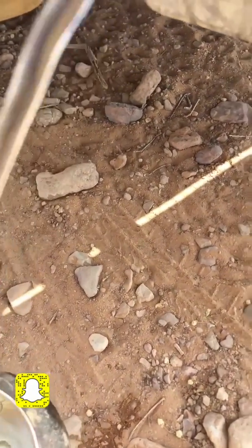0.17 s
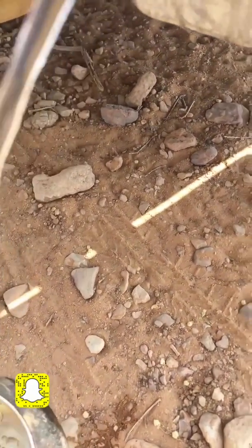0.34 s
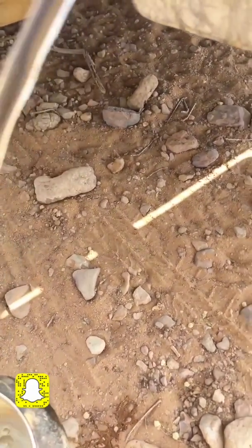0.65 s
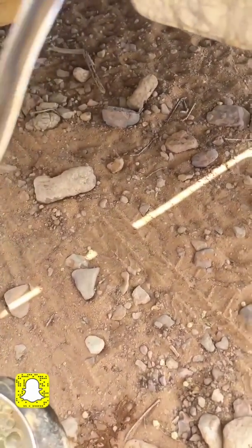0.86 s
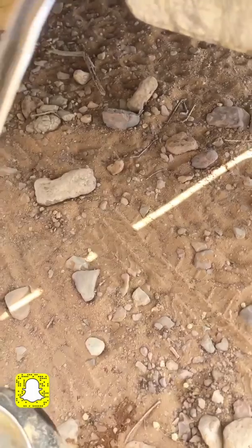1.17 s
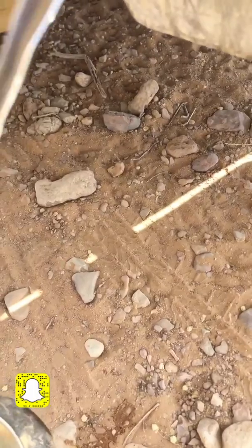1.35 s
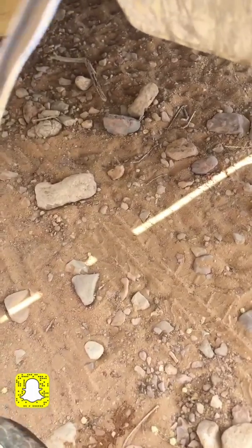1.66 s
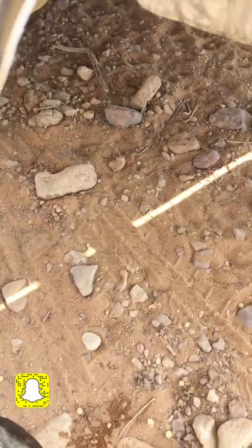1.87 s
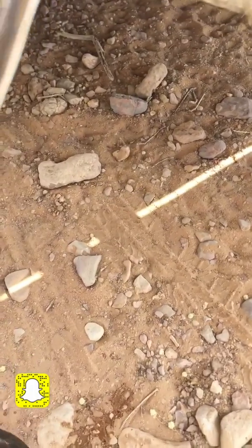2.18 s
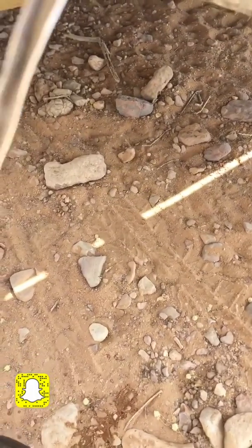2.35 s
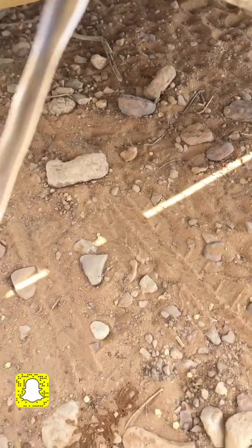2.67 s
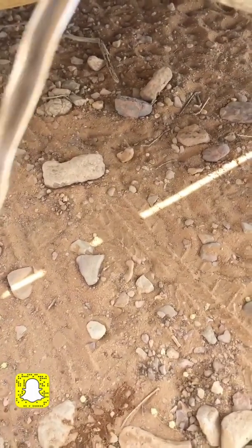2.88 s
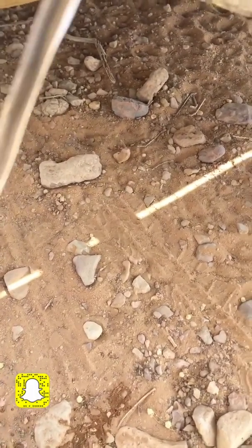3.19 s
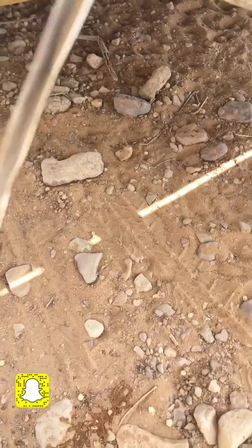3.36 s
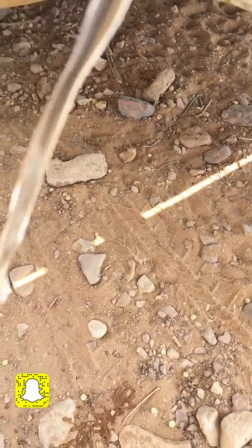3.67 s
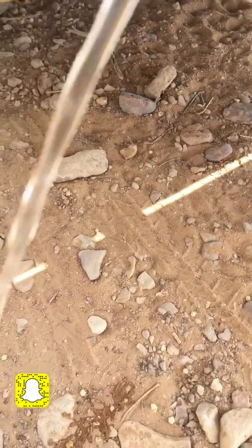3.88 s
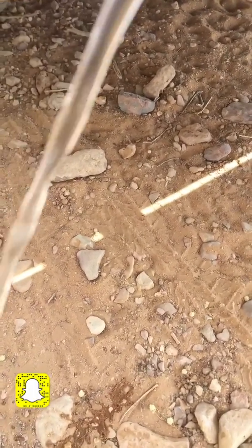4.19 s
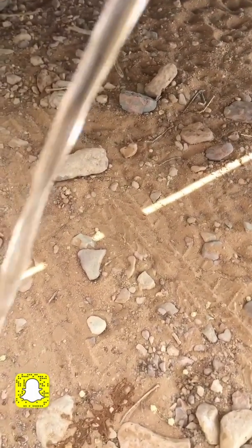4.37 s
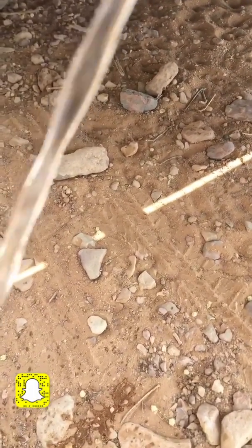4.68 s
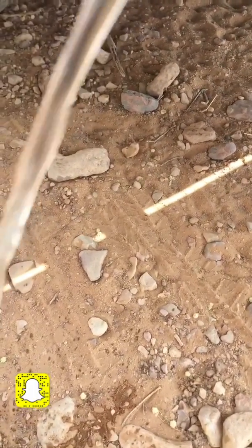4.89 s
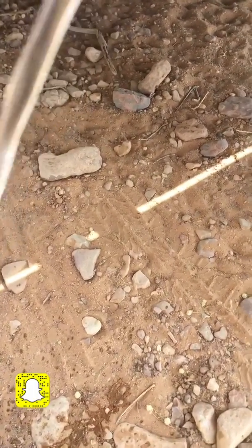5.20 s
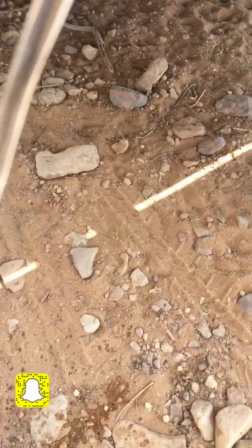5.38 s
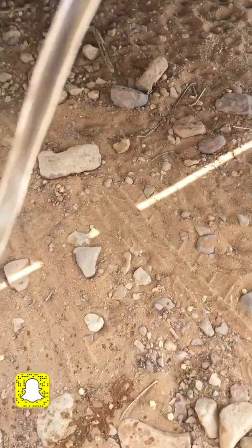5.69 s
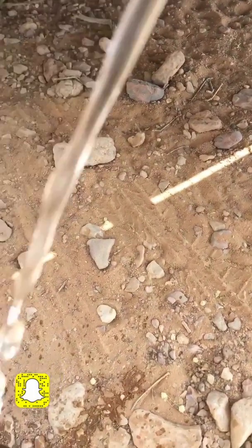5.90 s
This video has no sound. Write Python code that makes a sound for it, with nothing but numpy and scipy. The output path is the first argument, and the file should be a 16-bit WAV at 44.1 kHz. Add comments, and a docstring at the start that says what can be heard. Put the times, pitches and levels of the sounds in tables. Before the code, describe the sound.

Close, continuous trickling of water falling into a filling metal bowl, with hollow bubbly plops, deep glugs and bright spray ticks in open air.

```python
"""A thin stream of water falls from a height into a part-filled metal bowl, outdoors and close by.
The jet entrains air: large pockets glug as sinking tones, pinched-off bubbles plink as decaying resonators
on a slowly rising hollow note, and spray ticks on the surface as short bright tones and noise bursts.
Noise washes and swarms of small bubbles fill in the stirred water and fine hiss. Sparse echoes give the
wall's brief answer; the base sizzles and drums ever more faintly, over a low rumble of open air."""
import sys
import numpy as np
from scipy import signal
from scipy.fft import rfft, irfft, next_fast_len
from scipy.io import wavfile
from scipy.ndimage import uniform_filter1d, map_coordinates

SR = 44100
rng = np.random.default_rng(int(sys.argv[2]) if len(sys.argv) > 2 else 0)


def dump_mix(stems):
    """Bounce the given channels to the path in sys.argv[1] as a 16-bit WAV at rate SR."""
    frames = np.atleast_2d(stems).T  # one column per channel
    limited = np.clip(frames, -1, 1)  # hard clip at full scale
    pcm = np.round(limited * 32767).astype(np.int16)
    wavfile.write(sys.argv[1], SR, pcm)


N = 266584

# Largest air pockets under the jet: [start t/s, level/dB before the layer's trim, f/Hz, length/cycles]
GLUGS = [(0.15, -14.5, 189, 1.8), (0.297, -18.5, 190.3, 3.5), (0.526, -18, 210, 1.3),
         (0.563, -23, 174.8, 3.9), (0.927, -17.5, 162.2, 3.1), (0.986, -22.5, 204, 2.5),
         (1.204, -10.5, 164.2, 1.26), (1.243, -21, 196.3, 2), (1.268, -17, 173.5, 5.5),
         (1.521, -14, 158.7, 1.8), (1.565, -17.5, 227, 2.5), (1.616, -17, 206, 2.7),
         (1.822, -10, 170.7, 2.1), (1.887, -19, 226, 1.4), (2.015, -18.5, 234.3, 0.87),
         (2.074, -15, 183.3, 2.5), (2.213, -17, 181.5, 1.16), (2.264, -13, 202, 0.81),
         (2.278, -8.5, 188.3, 2.2), (2.33, -19.5, 229.5, 4.2), (2.42, -18, 165.3, 1.1),
         (2.47, -8, 273.8, 1.55), (2.681, -18.5, 237, 2), (2.742, -8, 213, 1.46), (2.767, -16, 216, 2.3),
         (2.802, -7, 257, 2.1), (2.835, -6, 228.1, 2.9), (2.937, -12, 249.6, 5.2), (2.982, -16.5, 228, 1.7),
         (3.013, -18, 174.7, 2.5), (3.031, -16, 269, 1.8), (3.189, -16.5, 184.4, 1.8),
         (3.248, -15.5, 237.4, 1.2), (3.353, -19.5, 254, 0.82), (3.523, -17.5, 255, 0.86),
         (3.768, -18.5, 245, 1.94), (3.897, -16.5, 201, 3.4), (3.939, -20, 208.6, 5.8),
         (3.994, -14, 215, 3), (4.057, -15, 228.8, 2.3), (4.087, -14.5, 228.3, 3.9),
         (4.174, -15.5, 218, 1.7), (4.261, -13.5, 184, 2.8), (4.303, -18, 283.6, 2.5),
         (4.333, -16, 223, 0.91), (4.408, -16, 199.3, 2.2), (4.43, -14, 184.8, 2.1),
         (4.451, -17.5, 198, 1.8), (4.662, -23, 166.3, 2.05), (4.783, -16, 207, 4.7),
         (4.808, -17.5, 156.2, 3.6), (4.855, -23.5, 196.6, 3.5), (4.928, -13.5, 171, 3.7),
         (4.973, -15.5, 248.5, 4.2), (4.998, -7, 172.3, 2.3), (5.047, -12.5, 312.4, 1.8),
         (5.065, -12.5, 239, 3.8), (5.246, -21.5, 154.6, 4.2), (5.299, -19, 173, 1.4),
         (5.431, -22, 298, 4.3), (5.465, -16, 193, 1.03), (5.633, -19, 144.2, 4.4),
         (5.719, -15, 162.6, 1.9), (5.758, -15.5, 182.6, 2.24), (5.963, -18, 183, 1)]
# Loudest bubbles pinching off: [t/s, level/dB before the layer's trim, f/Hz, decay time/cycles]
BUBBLES = [(0.002, -23.5, 783, 6.2), (0.05, -26.5, 807, 4.6), (0.159, -15, 786, 3), (0.216, -21.5, 724, 3),
           (0.262, -24.5, 810, 2.5), (0.341, -19.5, 727, 5.4), (0.41, -26, 2140, 8.8),
           (0.458, -16, 756, 2.3), (0.522, -23, 828, 9.5), (0.533, -20, 794, 3.3), (0.628, -17, 765, 3.5),
           (0.694, -16, 834, 1.5), (0.692, -37, 1380, 11), (0.748, -19.5, 784, 2.7),
           (0.832, -20.5, 850, 6.5), (0.975, -21.5, 878, 5.3), (1.005, -24, 760, 1.7),
           (1.077, -14, 786, 3.9), (1.147, -18, 805, 2.7), (1.161, -33, 2230, 12), (1.2, -22, 776, 3.4),
           (1.3, -19.5, 780, 2.3), (1.34, -23, 782, 4), (1.381, -22, 822, 3.9), (1.463, -21.5, 820, 4.3),
           (1.487, -19, 776, 4.6), (1.547, -22, 728, 4.2), (1.578, -28, 840, 3.6), (1.61, -23.5, 2710, 9.9),
           (1.668, -23.5, 867, 3.9), (1.701, -20, 835, 2.6), (1.746, -22, 866, 3.8),
           (1.816, -22.5, 962, 3.4), (1.927, -22.5, 1480, 4.5), (2.089, -21.5, 858, 4.9),
           (2.168, -26.5, 860, 7.4), (2.202, -13, 827, 2.9), (2.35, -23, 890, 3.3),
           (2.45, -21.5, 1650, 3.1), (2.48, -23, 837, 10), (2.504, -26.5, 851, 7.6), (2.534, -27, 820, 6),
           (2.579, -19, 850, 6.1), (2.625, -23.5, 867, 4.8), (2.749, -21.5, 830, 4.2),
           (2.777, -18.5, 860, 1.2), (3.011, -12.5, 900, 3.2), (3.329, -21, 860, 3.2),
           (3.362, -29, 830, 2.5), (3.387, -18.5, 846, 4.8), (3.499, -15, 860, 2.6),
           (3.516, -27, 855, 13.3), (3.57, -15.5, 893, 1.26), (3.663, -21.5, 887, 6.7),
           (3.859, -25.5, 940, 3.3), (3.935, -23, 890, 2.2), (4.045, -26, 840, 3.4),
           (4.049, -13.5, 1314, 1.2), (4.207, -23.5, 927, 4), (4.262, -19, 1620, 3.1),
           (4.263, -14, 930, 2.4), (4.341, -25.5, 1570, 3.5), (4.373, -25.5, 929, 7.1),
           (4.394, -13, 1464, 1.5), (4.405, -17.5, 934, 5.4), (4.651, -20.5, 918, 2.9),
           (4.706, -20.5, 1550, 2.8), (4.777, -21.5, 1630, 5), (4.779, -22.5, 836, 1.5),
           (4.863, -22.5, 892, 7.7), (4.896, -19.5, 1120, 1.9), (4.908, -22, 1504, 5.1),
           (4.946, -13, 970, 2.4), (5.004, -17.5, 860, 2.2), (5.045, -20, 824, 3.7), (5.092, -31, 950, 7.3),
           (5.206, -26, 872, 3.5), (5.336, -14, 926, 3.4), (5.518, -18, 922, 5.4), (5.548, -19.5, 894, 5.3),
           (5.665, -17.5, 1012, 2), (5.67, -32, 1210, 11), (5.733, -26, 965, 4), (5.779, -20.5, 845, 4.4),
           (5.797, -22.5, 893, 3.7), (5.905, -25, 870, 2.5), (5.942, -29, 1480, 5.3),
           (5.965, -23.5, 1536, 3.4)]
# Loudest spray drops landing: [t/s, level/dB before the layer's trim, f/Hz]
SPRAY = [(0.591, -19, 4120), (0.607, -22.5, 4180), (0.824, -15, 3900), (0.834, -17, 7000),
         (1.039, -19, 4030), (1.1288, -16.5, 4140), (1.1782, -17, 9900), (1.489, -23.5, 4450),
         (1.571, -20, 3870), (1.8125, -19, 7400), (1.8664, -21, 4270), (1.9582, -17, 4050),
         (2.0124, -18.5, 4000), (2.2483, -17.5, 7500), (2.2827, -16, 4010), (2.415, -18.5, 4000),
         (2.45, -21, 3930), (2.4571, -11.5, 4100), (2.607, -10.5, 4700), (2.6565, -15.5, 7140),
         (2.685, -15, 7160), (2.74, -19.5, 4070), (2.7985, -16.5, 6050), (2.872, -20, 3240),
         (3.1068, -22, 5500), (3.4615, -20.5, 3750), (3.516, -13.5, 4630), (3.556, -18, 7400),
         (3.7489, -12.5, 7360), (3.79, -14, 6700), (3.8114, -10.5, 7440), (3.8609, -9.5, 4240),
         (3.9585, -13, 8700), (4.014, -19, 4770), (4.0514, -22.5, 3850), (4.082, -18.5, 4200),
         (4.13, -17, 4630), (4.195, -19, 6960), (4.251, -17.5, 5600), (4.4055, -16.5, 3880),
         (4.4745, -16.5, 4970), (4.487, -14, 6350), (4.522, -22.5, 7100), (4.5428, -14, 7640),
         (4.6295, -10, 8700), (4.644, -28, 8300), (4.6646, -10.5, 6350), (4.6792, -14, 4200),
         (4.7095, -15, 4800), (4.7346, -10, 4700), (4.774, -17.5, 7900), (4.801, -18, 8450),
         (4.86, -20, 5200), (5.074, -16.5, 3440), (5.098, -22.5, 8050), (5.306, -22, 3620),
         (5.3776, -8.5, 4530), (5.4275, -13.5, 4360), (5.522, -18, 4800), (5.553, -26, 4700),
         (5.5666, -15, 3680), (5.6758, -18, 4140), (5.749, -15.5, 3840), (5.829, -19.5, 4360),
         (5.849, -11.5, 7500), (5.921, -15, 7400), (5.965, -14.5, 3940)]
# Sheets of water torn up by the jet and falling back: [t/s, level/dB before the layer's trim, length/s]
SPLASHES = [(0.004, -30.5, 0.0095), (0.795, -41, 0.013), (3.435, -34.5, 0.033), (3.51, -47, .025),
            (3.748, -33, 0.013), (3.825, -49, 0.043), (3.983, -29.5, 0.017), (4.045, -28, 0.0089),
            (4.108, -38, 0.037), (4.261, -30, 0.011), (4.298, -33, 0.021), (4.336, -30, .009),
            (4.397, -34.5, 0.032), (4.705, -25, .009), (4.95, -37, 0.01), (5.676, -26, 0.0084),
            (5.943, -49, .03)]
# How hard the jet stirs the water: [t/s, churning level/dB, bubbling level/dB, spraying level/dB],
# each before its trim in stirred_water
STIRRING = [(0.0, -45, -37, -48.5), (0.42, -53.5, -38.5, -47), (1.1, -39, -38, -50),
            (1.25, -29.5, -33.5, -46), (1.41, -49.5, -36, -47.5), (1.55, -37, -38.5, -49),
            (1.9, -42, -38.5, -45.5), (2.45, -35.5, -38, -53), (2.6, -50.5, -43.5, -50.5),
            (2.7, -35.5, -47, -41.5), (2.9, -40.5, -44, -45.5), (3.25, -33.5, -39.5, -48),
            (3.42, -43.5, -44, -43), (3.53, -41, -38, -44), (3.8, -40.5, -42, -46.5),
            (4.0, -34, -46, -45.5), (4.44, -39.5, -42, -47), (4.56, -46.5, -59, -44),
            (4.72, -49, -40, -43.5), (4.8, -26, -57, -45.5), (4.91, -34.5, -36, -45),
            (5.06, -30.5, -52, -46), (5.14, -43.5, -43.5, -46.5), (5.28, -42, -50, -46.5),
            (5.53, -39, -46.5, -41), (5.75, -45, -32.5, -39.5), (5.87, -49, -56, -43),
            (5.95, -34.5, -36.5, -45), (6.04, -58, -52, -43.5)]
# Relative spectra of the blended low, middle and high washes: [f/Hz, level/dB]
CHURN = [(25, -38), (50, -41), (80, -18), (130, 0.5), (175, 3), (250, -38), (330, -2), (550, -25.5),
         (1200, -70)]
BABBLE = [(350, -26), (600, 16.5), (850, -7), (1100, 10.5), (1350, -34), (2050, -15), (2500, 2.5),
          (5000, -9)]
FIZZ = [(1500, 6.5), (2300, 4), (3100, -1), (4100, -33), (5600, -3.5), (7600, -2.5), (10000, -16),
        (12500, -8), (16000, -5)]
# Fine bright hiss of the spray: [t/s, level/dB]
HISS = [(0, -57.5), (1.8, -54.5), (2.65, -49.5), (3.15, -60), (3.65, -46), (4.75, -50.5), (5.2, -55),
        (5.7, -58), (6.04, -47)]
# Hollow note of the filling bowl, rising: [t/s, f/Hz]
BOWL_NOTE = [(0, 745), (2.5, 836), (6, 928)]
# Faint ring of the wall, sinking as the water loads it: [t/s, f/Hz]
WALL_NOTE = [(0, 2048), (5.997, 1910)]
# Low drumming of the base, sinking likewise: [t/s, f/Hz]
BASE_NOTE = [(0, 340.3), (6, 329)]
# Colour of the wall's echoes: [f/Hz, level/dB before each layer's wall level]
WALL = [(100, -1), (500, -4.5), (830, 13.5), (1300, 9), (2000, 21.5), (2600, 3.5), (4100, 3), (5700, -7.5),
        (7600, 6), (15000, -12)]
# Colour the open bowl gives to all that sounds in it: [f/Hz, level/dB]
BOWL = [(150, 3), (310, 2), (470, 0.5), (640, -7), (790, 0), (1250, 0.5), (1800, -7), (2050, -6.5),
        (2500, -14.5), (3000, -9), (3400, -7), (3900, -2.5), (6200, -5), (9500, -0.5), (13000, -12)]
# Relative spectrum of the open air's rumble: [f/Hz, level/dB]
AIR = [(25, 15.5), (50, -23), (100, 7.5), (300, -51), (1000, -36)]

AIR_DB = -41.5  # rms level of the rumble before the final high-pass
TOP_HZ = 16100  # upper band limit
SWELL_CYCLES = 1.37  # from a pocket's start to its peak, in cycles of its nominal pitch
CLIMB = .06  # typical rise of a bubble's pitch, as a share per decay time
LESSER_DROP_DB, LESSER_DROP_SCATTER_DB = 20.5, 5  # level over the spraying curve, and its scatter
DROP_HZ = 4970  # centre pitch of the lesser drops


def glugs(level_db=-2.5, width=0.61, lobe_db=-11, lobe_ratio=1.6, heave_db=-12, heave_ratio=0.715,
          rough=0.13, sag=0.077, froth_db=-15, froth_hz=330):
    """Volume oscillation of big air pockets: a short tone, a higher lobe, a lower heave and torn froth."""
    s, db, hz, cycles = np.transpose(GLUGS)[..., None]
    draws = rng.uniform(-1.047, 1, (len(s), 6)).T[..., None]
    phase, lobe_phase, heave_phase, lobe_size, lobe_lag, heave_lag = draws
    lead = .03  # seconds kept before each peak
    t = clock(3 * lead) - lead
    u = t * hz / (width * cycles)  # time in envelope widths

    def swell(u):
        """A smooth envelope, steeper in growth than in decay."""
        return 1 / np.cosh(np.where(u < 0, 1.7, 1.3) * np.clip(u, -40, 40))

    # the jet keeps deforming and widening the pocket, so its pitch wanders and sinks
    wander = unit(uniform_filter1d(rng.standard_normal((len(s), len(t))), size=160, axis=1))
    pitch = hz * (1 + rough * wander - 2 * sag * np.tanh(u / 2))
    angle = 2 * np.pi * np.cumsum(pitch, axis=1) / SR
    pocket = swell(u) * np.sin(angle + np.pi * phase)
    lobe_angle = angle * lobe_ratio * np.exp(0.2037 * lobe_size)
    lobe = swell(0.95 * (u - 0.27 * lobe_lag)) * np.sin(lobe_angle + np.pi * lobe_phase)
    heave = swell(0.75 * (u - heave_lag)) * np.sin(angle * heave_ratio + np.pi * heave_phase)
    torn = band_passed(rng.standard_normal(u.shape), 2, froth_hz / 2, froth_hz * 1.53)
    froth = swell(0.6 * u) * unit(torn)
    glug = pocket + amp(lobe_db) * lobe + amp(heave_db) * heave + amp(froth_db) * froth
    return placed(s + SWELL_CYCLES / hz - lead, amp(db + level_db) * glug)


def bubbles(level_db=6, puff_db=-13, puff_life=0.0014, twin_db=-17, twin_ratio=5.1, wall_db=-17,
            tick_db=-25, tick_life=0.0043, linger_db=-18.0, linger_s=0.0132):
    """Damped bubble resonance: a plink with a wet puff, a higher twin just after, and a rising afterring."""
    s, db, hz, cycles = np.transpose(BUBBLES)[..., None]
    lag, twin_size, shallowness, lift = rng.uniform(0, 1, (len(s), 4)).T[..., None]
    life = cycles / hz
    t = clock(.07)
    rise = 2 * CLIMB * shallowness  # shallow bubbles rise in pitch, deep ones hold
    tone = ping(t, hz / (1 + rise), life, rise, attack=0.17 * life)
    twin_hz = hz * twin_ratio ** (.5 + twin_size)
    twin = ping(np.maximum(t - lag * life, 0), twin_hz, 0.5 * life, CLIMB, attack=0.0013)
    linger = ping(t, hz / (1 + rise), linger_s, 3.5 * CLIMB * lift, attack=linger_s / 2)
    puff = band_passed(noise_burst(tone.shape, t, puff_life), 4, 550, 2150)
    puff /= np.abs(puff).max(axis=1, keepdims=True)
    # the neck of the bubble snaps shut with a tick
    tick = band_passed(noise_burst(tone.shape, t, tick_life), 1, 900, 4500)
    plink = tone + amp(linger_db) * linger + amp(twin_db) * twin
    plink += amp(puff_db) * puff + amp(tick_db) * tick
    return placed(s, in_bowl(amp(db + level_db) * plink, wall_db, t60=0.061))


def spray(level_db=4, cycles=3.1, crack_db=-12, crack_life=0.0014, litter_db=-9, spread=0.21,
          slap_db=-7, slap_life=0.00012, count=4):
    """Drop impact: a slap and crack, a trapped bubble's resonance, and a litter of smaller and larger ones."""
    at = scattered(count=120)
    spraying_db = stirring(at)[2]
    small = lesser(at, spraying_db + LESSER_DROP_DB, LESSER_DROP_SCATTER_DB, DROP_HZ, spread=0.407)
    s, db, hz = np.vstack([SPRAY, small]).T[..., None]
    size, lag = rng.standard_normal((len(s), count, 2)).T[..., None]
    t = clock(.02)
    tone = ping(t, hz, life=cycles / hz, glide=.015, attack=.00015)
    litter_hz = np.clip(hz * np.exp(spread * size), 2800, 13000)
    late = np.maximum(t - .0035 * np.abs(lag), 0)
    litter = ping(late, litter_hz, life=cycles / litter_hz, glide=.025, attack=.0002).sum(axis=0)
    crack = band_passed(noise_burst(tone.shape, t, crack_life), 2, 3300, 13500)
    # higher-pitched drops slap harder
    slap = noise_burst(tone.shape, t, slap_life) * hz / DROP_HZ
    slap = signal.lfilter(*signal.butter(2, 5500, "high", fs=SR), slap)
    tick = tone + amp(crack_db) * crack + amp(litter_db) * litter + amp(slap_db) * slap
    return placed(s, in_bowl(amp(db + level_db) * tick, wall_db=-7.5, t60=0.027))


def splashing(level_db=1, rise=.0015, release=0.0021, clump_db=4, ring_db=-2):
    """Sheet break-up: gated, clumpy showers of tiny droplets and briefly ringing bubbles."""
    s, db, length = np.transpose(SPLASHES)[..., None]
    t = clock(.06)
    envelope = (1 - np.exp(-t / rise)) * np.exp(-np.maximum(t - length, 0) / release)
    sheets = placed(s, amp(db + level_db) * envelope)
    shower = swarm(count=28000, centre_hz=5670, spread=0.41, cycles=1.2, size_db=12, glide=0, onset=0.11)
    rings = swarm(count=5000, centre_hz=4600, spread=0.3, cycles=8, size_db=6, glide=0.015, onset=0.1)
    return sheets * unit(shower * amp(clump_db * wobble(300)) + amp(ring_db) * rings)


def stirred_water(churn_db=-3, bubble_db=-2, spray_db=-3, pip_db=-6, pip_db_per_s=1, shed_grows=0.4,
                  wall_ring_db=-14, hollow_db=-11, gurgle_db=-4, blip_db=-2):
    """Superposition of many small sources: under the loud events the jet keeps churning, bubbling, fizzing."""
    s = np.arange(N) / SR
    churning, bubbling, spraying = amp(stirring(s))
    pockets = swarm(count=400, centre_hz=194.6, spread=0.27, cycles=1.51, size_db=6.5, glide=0.058, onset=1.0)
    plinks = swarm(count=520, centre_hz=817.6, spread=0.141, cycles=4.6, size_db=5.0, glide=CLIMB,
                   onset=0.43, rising=True)
    pips = swarm(count=700, centre_hz=1790, spread=0.18, cycles=10.2, size_db=7.0, glide=CLIMB,
                 onset=0.37, rising=True)
    drops = swarm(count=3600, centre_hz=3980, spread=0.132, cycles=5.6, size_db=2.5, glide=0.025, onset=0.093)
    # stray small bubbles blip on their own, and middling ones gurgle upward below the plinks
    blips = swarm(count=420, centre_hz=3900, spread=0.27, cycles=10, size_db=6.5, glide=0.02, onset=0.2)
    gurgles = swarm(count=260, centre_hz=640, spread=0.3, cycles=4.5, size_db=5, glide=0.09, onset=0.6)
    low = amp(6.5) * pockets + amp(1) * wash(CHURN, flutter_db=5.5, rate=36)
    # each small splash lifts babble, drops and fizz at once
    surge = splashes(count=420, size_db=11, life=0.0024, rise=0.0022) + amp(-3)
    middle = amp(4.0) * plinks + amp(gurgle_db) * gurgles
    middle += amp(hollow_db) * hollow(76, BOWL_NOTE) + amp(wall_ring_db) * hollow(100, WALL_NOTE)
    # harder churning and deeper water shed more small pips
    shedding = (churning / churning.mean()) ** shed_grows * amp(pip_db_per_s * (s - s.mean()))
    middle += amp(pip_db) * shedding * pips
    middle += amp(-6.0) * surge * wash(BABBLE, flutter_db=4.0, rate=39)
    high = surge * (amp(-2.5) * drops + amp(2.0) * wash(FIZZ, flutter_db=4.5, rate=140))
    high += amp(blip_db) * blips
    stirred = amp(churn_db) * churning * low + amp(bubble_db) * bubbling * middle
    return stirred + amp(spray_db) * spraying * high


def hiss(flutter_db=5.0, rate=45):
    """Dense random impacts merge into noise: the finest droplets land too thickly to tell apart."""
    mist = swarm(count=20000, centre_hz=7300, spread=0.2, cycles=3.5, size_db=9, glide=0, onset=0.1)
    level = amp(np.interp(np.arange(N) / SR, *np.transpose(HISS)))
    return level * unit(mist * amp(flutter_db * wobble(rate)))


def shallow_bowl(sizzle_db=-39, sizzle_hz=2400, drum_db=-45, damping_db_per_s=6.0):
    """Damping by water depth: jet on metal sizzles and drums the base, steadily less as the bowl fills."""
    s = np.arange(N) / SR
    sizzle = swarm(count=4000, centre_hz=sizzle_hz, spread=0.19, cycles=7, size_db=8, glide=0.03, onset=0.14)
    return amp(-damping_db_per_s * s) * (amp(sizzle_db) * sizzle + amp(drum_db) * hollow(8, BASE_NOTE))


def open_air():
    """Broadband background: steady noise weighted to the bass."""
    return amp(AIR_DB) * unit(filtered(rng.standard_normal(N), lambda hz: gain(AIR, hz)))


def ping(t, hz, life, glide, attack):
    """Damped resonance: a bubble rings, dies away and rises in pitch as it nears the surface."""
    turns = hz * (t + glide * t * np.minimum(t / life, 10) / 2)
    return np.sin(2 * np.pi * turns) * np.exp(-t / life) * (1 - np.exp(-t / attack))


def swarm(count, centre_hz, spread, cycles, size_db, glide, onset, rising=False):
    """Random superposition of small bubbles, rms 1; the pitch of rising ones follows the bowl's note."""
    pitch, size, age = rng.standard_normal((count, 3)).T[..., None]
    s = scattered(count)
    note = np.interp(s, *np.transpose(BOWL_NOTE))
    centre = centre_hz * note / note.mean() if rising else centre_hz
    hz = np.clip(centre * np.exp(spread * pitch), 50, TOP_HZ)
    life = cycles / hz * np.exp(0.49 * age)
    t = clock(6 * cycles / centre_hz)
    fade = 1 - (t / t[-1]) ** 2
    rings = ping(t, hz, life, glide, onset * life) * fade
    return unit(placed(s, rings * amp(size_db * 2 * np.tanh(size / 2))))


def wash(spectrum, flutter_db, rate):
    """Modulated noise: bubbles too many to tell apart, coming in quick surges, rms 1."""
    noise = filtered(rng.standard_normal(N), lambda hz: gain(spectrum, hz))
    return unit(noise * amp(flutter_db * wobble(rate)))


def splashes(count, size_db, life, rise):
    """Power addition of small splash envelopes: each swells quickly and drains away, rms 1."""
    size = amp(size_db * 2 * np.tanh(rng.standard_normal((count, 1)) / 2))
    t = clock(.05)
    strength = size * np.exp(-t / life) * (1 - np.exp(-t / rise))
    return unit(np.sqrt(placed(scattered(count), strength ** 2)))


def hollow(width_hz, track):
    """Narrow-band resonance: slow complex noise carried on a gliding note, rms 1."""
    note = np.interp(np.arange(N) / SR, *np.transpose(track))
    drift = wobble(2 * width_hz) + 1j * wobble(2 * width_hz)
    return unit(np.real(drift * np.exp(2j * np.pi * np.cumsum(note) / SR)))


def in_bowl(sounds, wall_db, t60):
    """Early reflection: each sound starts at another spot, so gets its own few strong wall echoes."""
    t = clock(.03)
    scatter = rng.standard_normal((len(sounds), len(t))) ** 5  # the high power leaves few strong echoes
    scatter *= amp(-60 * t / t60) * (t > .0008)
    scatter /= np.linalg.norm(scatter, axis=1, keepdims=True)
    answer = amp(wall_db) * signal.fftconvolve(scatter, causal(WALL)[None], axes=1)
    answer[:, 0] += 1  # direct sound
    return signal.fftconvolve(sounds, answer, axes=1)


def stirring(s):
    """Churning, bubbling and spraying levels in dB, interpolated at these times."""
    knots, *columns = np.transpose(STIRRING)
    return [np.interp(s, knots, c) for c in columns]


def lesser(s, db, scatter_db, hz, spread):
    """Random rows [t/s, level/dB, f/Hz] scattered around a level and a pitch."""
    size, pitch = 2 * np.tanh(rng.standard_normal((len(s), 2)).T[..., None] / 2)
    return np.hstack([s, db + scatter_db * size, hz * np.exp(spread * pitch)])


def scattered(count):
    """Jittered, uneven times all through the pour, as a column."""
    jitter = rng.uniform(-0.91, 1, (count, 1))
    return (np.arange(count)[:, None] + jitter) / count * N / SR


def placed(times, sounds):
    """Superposition: sum one sound per row at its start time."""
    at = np.round(times * SR).astype(int) + np.arange(sounds.shape[1])
    inside = (at >= 0) & (at < N)
    return np.bincount(at[inside], sounds[inside], N)


def clock(seconds):
    """Sample times of one short sound."""
    return np.arange(int(seconds * SR)) / SR


def wobble(rate):
    """A smooth random curve through `rate` knots a second."""
    knots = rng.standard_normal(int(N * rate / SR) + 4)
    return map_coordinates(knots, [np.arange(N) * rate / SR])


def noise_burst(shape, t, life):
    """Impulsive noise with exponential decay."""
    return rng.standard_normal(shape) * np.exp(-t / life)


def band_passed(x, order, low_hz, high_hz):
    """Band-pass filtering between two corner frequencies."""
    return signal.lfilter(*signal.butter(order, [low_hz, high_hz], "band", fs=SR), x)


def filtered(x, response):
    """Linear filtering: the spectrum of x times a response of frequency."""
    m = next_fast_len(N + SR // 4)
    return irfft(rfft(x, m) * response(np.fft.rfftfreq(m, 1 / SR)), m)[:N]


def causal(points, size=512):
    """Minimum-phase impulse response of this colour, by folding the cepstrum: nothing sounds early."""
    cep = irfft(np.log(gain(points, np.fft.rfftfreq(size, 1 / SR))))
    cep[1:size // 2] *= 2
    cep[size // 2 + 1:] = 0
    return irfft(np.exp(rfft(cep)))


def gain(points, hz):
    """Gain from [f/Hz, level/dB] points, interpolated on a log frequency axis."""
    f, db = np.transpose(points)
    return amp(np.interp(np.log(hz + 1), np.log(f), db))


def amp(db):
    """Decibels to gain."""
    return 10 ** (np.asarray(db) / 20)


def unit(x):
    """Scale to rms 1."""
    return x / np.sqrt(np.mean(x ** 2) + 1e-20)


def scene():
    """Free field: open ground gives no echo, so only the water, its bowl and a little rumble of air."""
    water = glugs() + bubbles() + spray() + splashing() + hiss() + stirred_water() + shallow_bowl()
    return signal.fftconvolve(water, causal(BOWL, size=2048))[None, :N] + open_air()


def record(dry, bass_hz=72):
    """Band limiting: a high-pass thins the deep bass and nothing is kept from TOP_HZ up."""
    thinned = signal.lfilter(*signal.butter(2, bass_hz, "high", fs=SR), dry[0])
    return filtered(thinned, lambda hz: hz < TOP_HZ)[None]


dry = scene()
out = record(dry)
dump_mix(out)
```